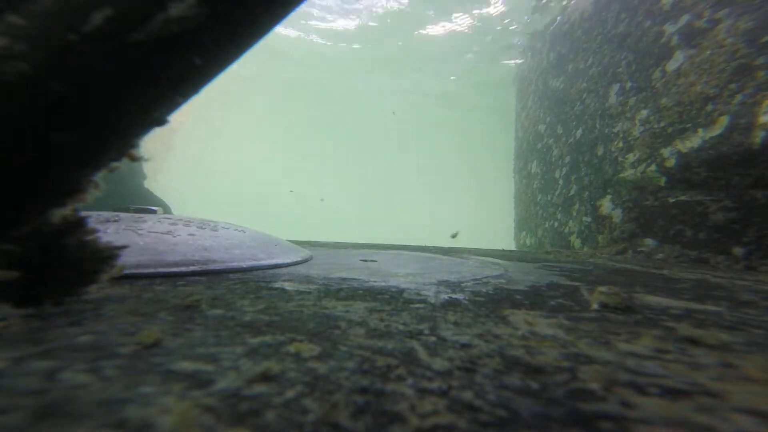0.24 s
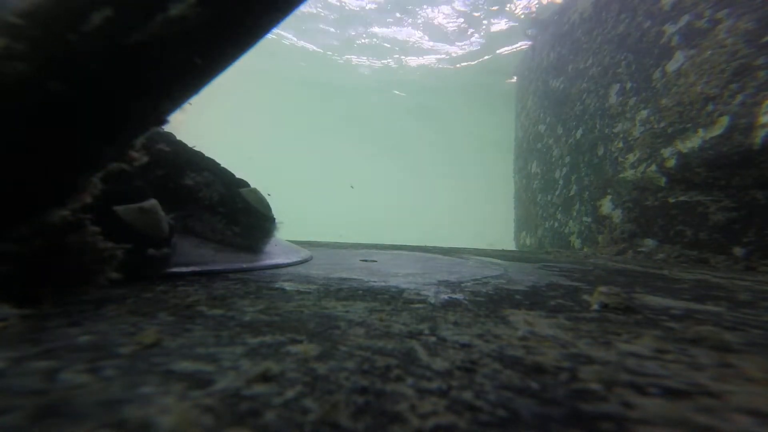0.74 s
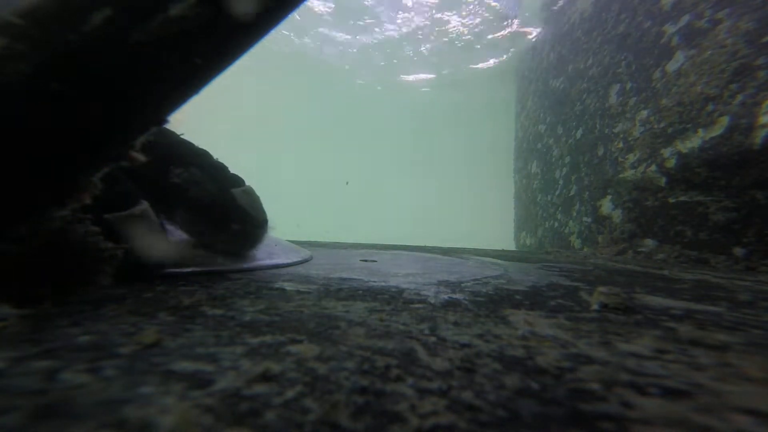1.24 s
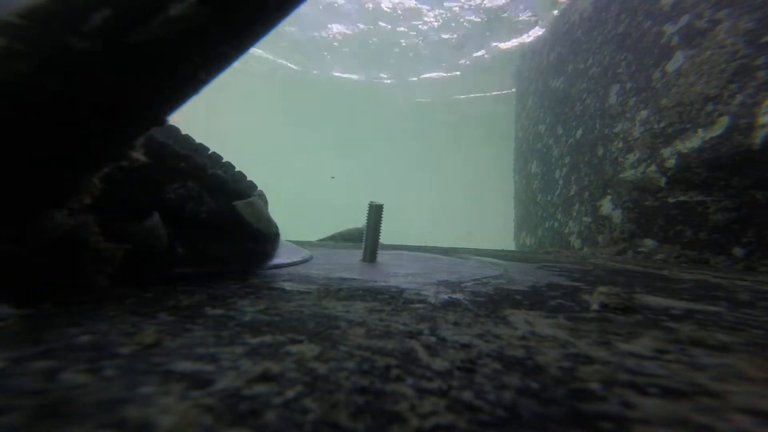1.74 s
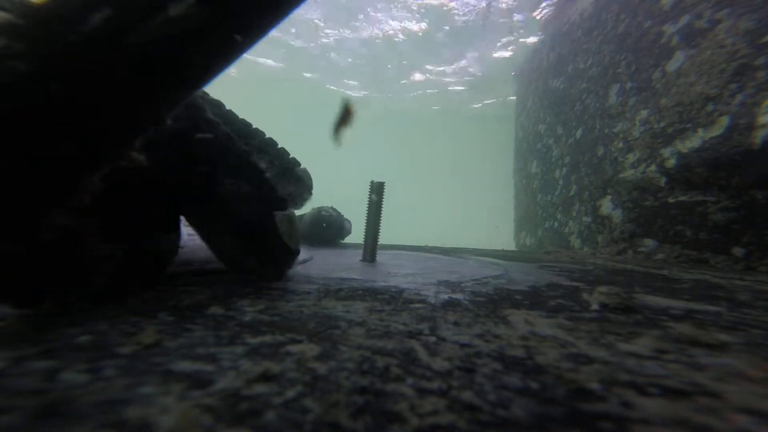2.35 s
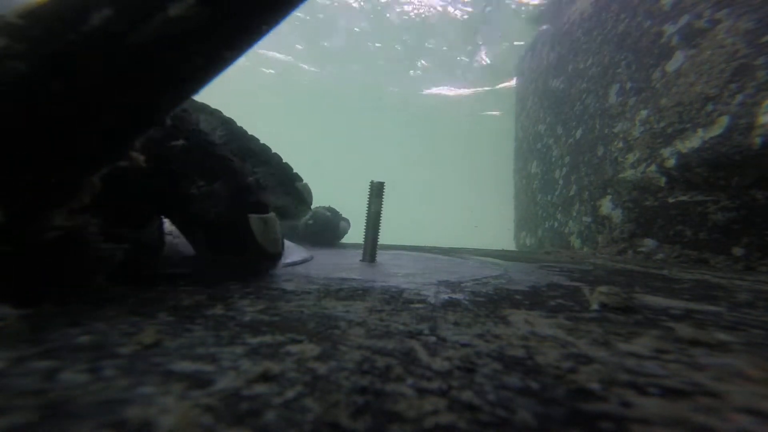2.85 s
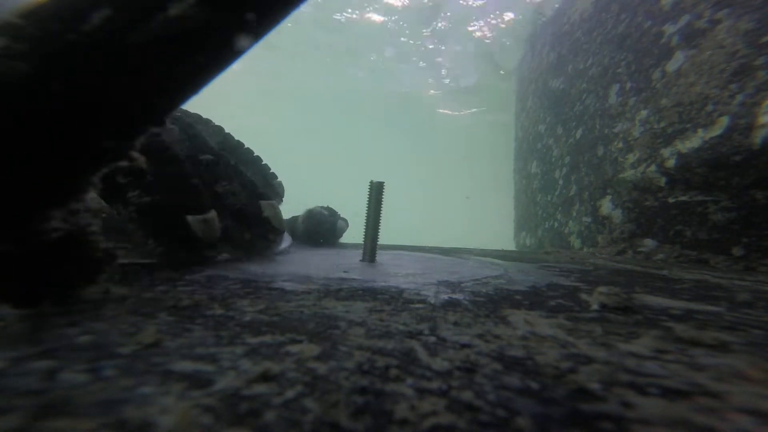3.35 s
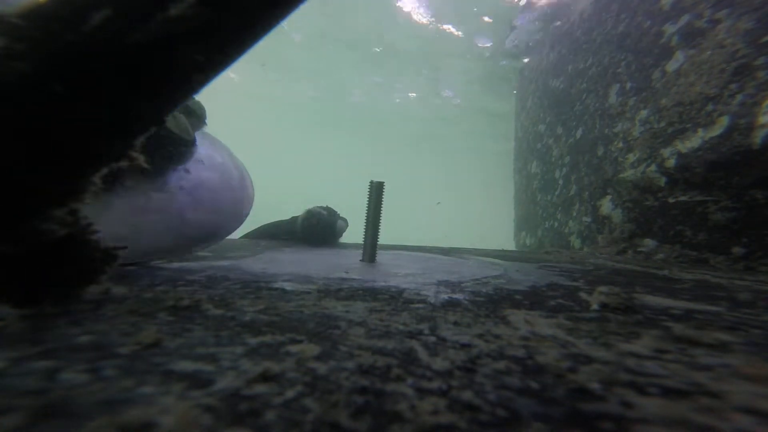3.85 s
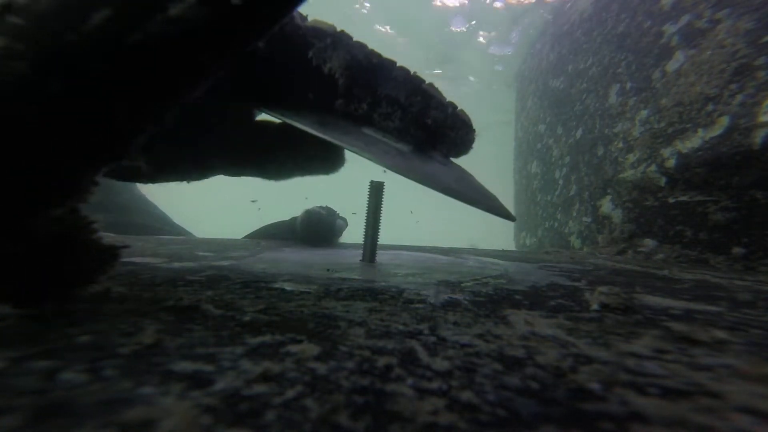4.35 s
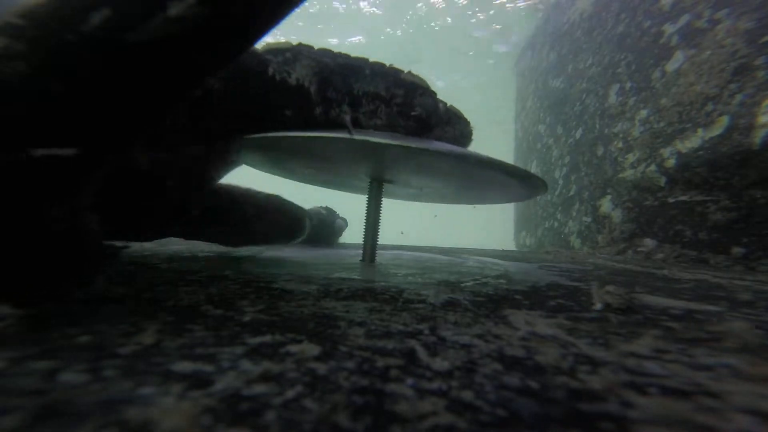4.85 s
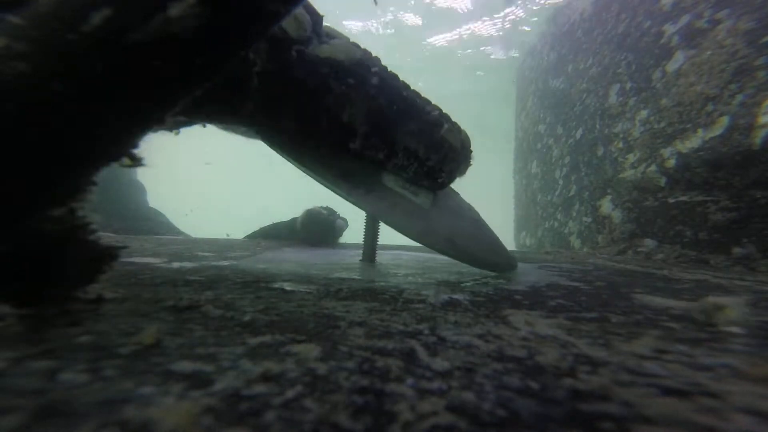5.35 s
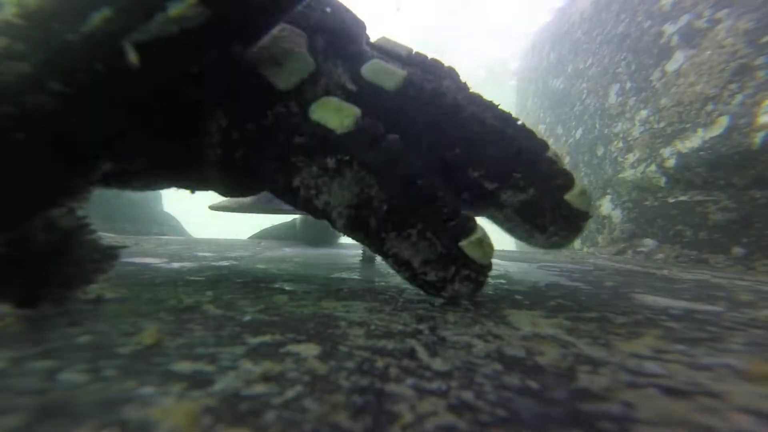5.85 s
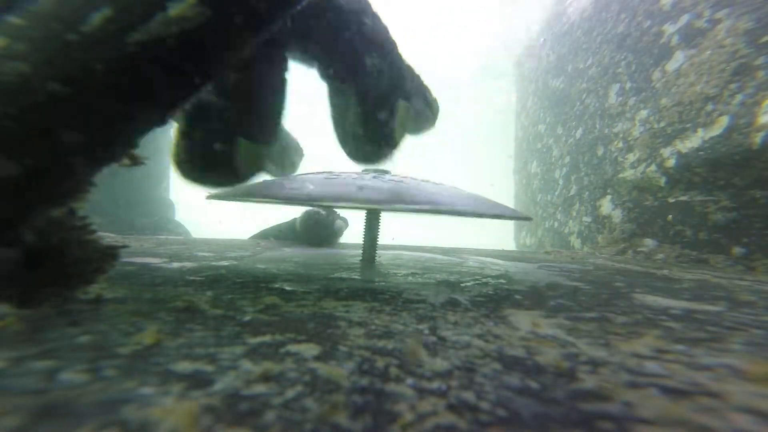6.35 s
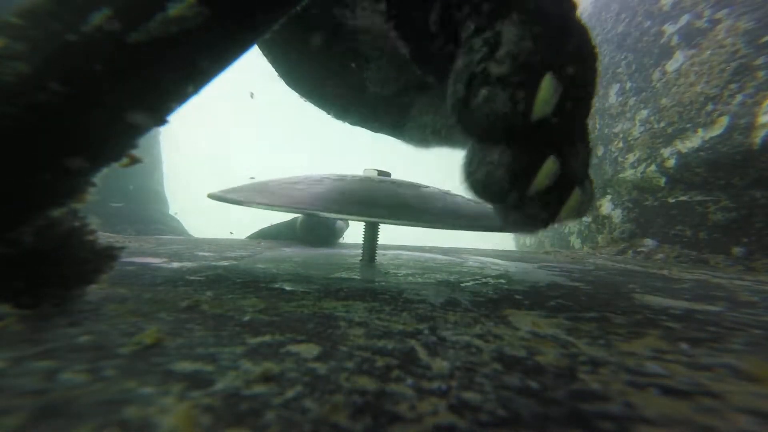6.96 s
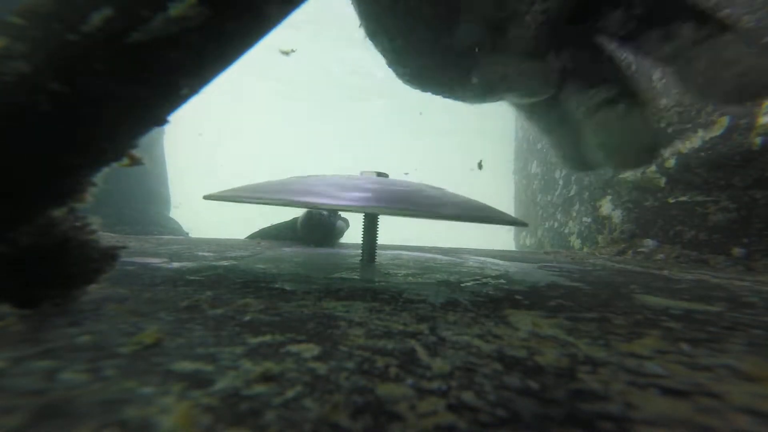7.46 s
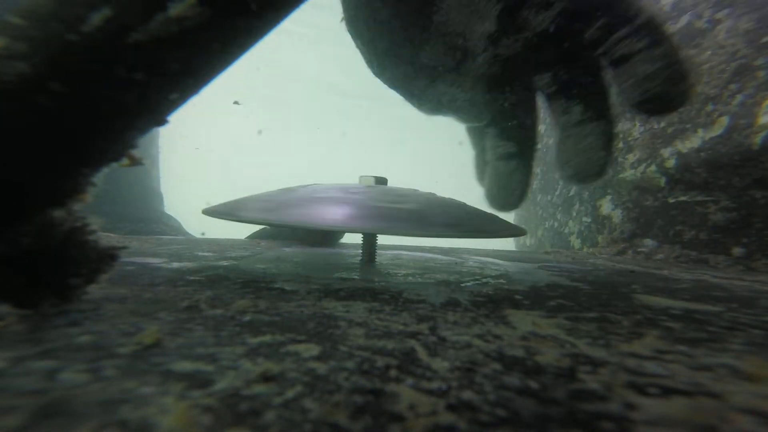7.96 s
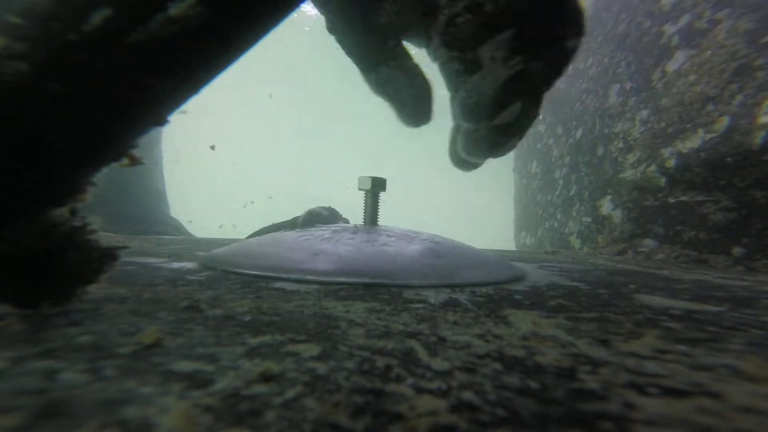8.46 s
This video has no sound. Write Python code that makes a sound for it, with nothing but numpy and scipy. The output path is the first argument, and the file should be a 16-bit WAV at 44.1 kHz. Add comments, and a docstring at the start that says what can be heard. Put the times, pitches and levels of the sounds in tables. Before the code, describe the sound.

Underwater, close muffled knocks and gritty metal scrapes ring a sealed housing over low surging rumble, bubbling rubs and a fast motor throb.

```python
"""Under water, knocks and scrapes ring a sealed camera's housing, some on one clear pitch, over a surging rumble.
A gloved diver slides a metal disc onto a bolt on a boat hull and spins it down: pushes and stick-slip clicks
excite damped modes of housing and disc. Bumps rock the camera, the hull booms and hums, bubbles gurgle as
gliding sines, and a motor on board repeats its knocks every turn. The level of these steady sounds twitches
in short steps and at times drops suddenly."""
import sys
import numpy as np
from scipy import signal
from scipy.io import wavfile
from scipy.ndimage import uniform_filter1d, minimum_filter1d

SR = 44100
rng = np.random.default_rng(int(sys.argv[2]) if len(sys.argv) > 2 else 0)


def master(y):
    """Save y as 16-bit WAV."""
    cut = np.clip(np.atleast_2d(y).T, -1, 1)
    pcm = np.round(cut * 32767)  # scale
    wavfile.write(sys.argv[1], SR, pcm.astype(np.int16))


N = 384111
T = np.arange(N) / SR  # time in s

# Modes of each family, roughly from low to high; level_db is relative within a family,
# t60_s holds where ring() adds no damping.
# hull plating: pitch_hz, t60_s, level_db
HULL = [(113.14, 0.69, -7), (150.3, 0.19, 4.5), (168.4, 0.37, -6), (197.9, 0.33, -3.5), (231.4, 0.11, 0.5),
        (276.6, 0.078, -2.5), (340.5, 0.079, -6), (397, 0.056, -16)]
# camera housing: pitch_hz, t60_s, level_db
HOUSING = [(553.5, 0.2, -8), (538, 0.03, 0), (607.5, 0.064, 7), (671.3, 0.04, 4.5), (720, 0.15, -9.5),
           (1036, 0.17, -18)]
# hard contact: pitch_hz, t60_s, level_db
CONTACT = [(840, 0.012, -5.5), (1047, 0.034, 1.5), (1148, 0.018, 3.5), (1248, 0.016, 2),
           (1440, 0.015, -5.5), (1632, 0.02, -8)]
# metal edge of the disc: pitch_hz, t60_s, level_db
EDGE = [(1870, 0.025, 7), (2025, 0.013, 8.5), (2420, 0.017, 0), (2670, 0.01, -1), (3060, 0.0055, -6.5),
        (3640, 0.007, -20), (4000, 0.006, -30)]
# highest ticks: pitch_hz, t60_s, level_db
TICK = [(4270, 0.0032, -1.5), (4900, 0.0035, -0.5), (5730, 0.0017, -3.5), (6750, 0.003, -4),
        (7800, 0.0022, -8), (9600, 0.0013, -14), (12500, .002, -9.5)]
# strokes of the disc over rough metal: start_s, end_s, contact_db, edge_db
SCRAPES = [(0.655, 0.702, -58, -71), (1.443, 1.545, -44.5, -67), (1.605, 1.613, -37.5, -48),
           (1.633, 1.67, -31.5, -55), (1.978, 2.02, -22, -39.5), (2.032, 2.094, -30.5, -53),
           (2.794, 2.84, -30, -57.5), (4.479, 4.512, -39, -56), (5.232, 5.255, -41, -53.5),
           (5.735, 5.766, -48, -71), (7.793, 7.833, -42.5, -67), (8.323, 8.347, -36, -53.5),
           (8.362, 8.395, -29.5, -51.5), (8.412, 8.446, -31.5, -55), (8.453, 8.459, -14, -38),
           (8.5, 8.523, -33.5, -49), (8.527, 8.537, -30, -47), (8.557, 8.576, -29, -47)]
# steady rubbing and gurgling of gloves on the housing: time_s, level_db
RUBBING = [(0.0, -26), (0.8, -27.5), (1.48, -26.5), (2.18, -48), (2.71, -39.5), (3.23, -39), (3.49, -46),
           (4.56, -26.5), (4.95, -33), (5.38, -26.5), (5.89, -33), (7.01, -25), (7.74, -29.5),
           (8.08, -29.5), (8.22, -29), (8.32, -18.5), (8.56, -27.5), (8.71, -44)]
# sound carried by the hull plating, motor and grinding grit alike: time_s, carried_db
CARRIED = [(0, -11), (1.1, -13.5), (1.5, -6.5), (2.1, -11.5), (2.4, -0.5), (2.7, 1), (3.1, 5), (3.43, -1.5),
           (3.8, 2), (4.15, 3), (4.45, 0), (4.8, -13), (5.4, -13), (5.8, -21), (6.5, -11), (7.1, -8),
           (7.85, -15.5), (8.2, -13.5), (8.4, -6.5), (8.71, 1)]
# water surge and hull boom: time_s, surge_db, boom_db
SURGE = [(0.0, -34, -27.5), (0.61, -25.5, -26), (1.62, -26, -32.5), (1.94, -30, -27), (2.28, -44, -36.5),
         (2.88, -29.5, -31), (3.2, -42.5, -28.5), (3.54, -41.5, -35.5), (3.95, -25.5, -33),
         (4.39, -35, -25), (4.66, -26.5, -21), (4.85, -16, -34), (5.19, -29.5, -27.5), (6.45, -33, -29.5),
         (7.16, -25.5, -23.5), (8.03, -35.5, -31.5), (8.3, -28.5, -31), (8.71, -39.5, -31)]
# sudden drops, each with a thin click (an end before the start leaves the click alone):
# start_s, end_s, change_db, click_peak_db
DIPS = [(.416, 0.37, -0.5, -36), (0.61, 0.69, -3.5, -40.5), (1.347, 1.08, -1, -70), (1.568, 1.26, -1, -45),
        (1.6, 2.04, -0.5, -36.5), (1.696, 1.9, -2, -45.5), (3.04, 3.185, -13, -45),
        (4.448, 4.55, -12, -33.5), (5.509, 5.546, -6, -38), (7.36, 6.3, 0.5, -30.5),
        (7.744, 6.8, 0.5, -40.5), (8.416, 9.2, -2, -41)]
STEP_S = .032  # grid of the level steps
SCRAPE_RISE_S, SCRAPE_FALL_S = 0.0034, 0.0062


def undb(db):
    """Amplitude ratio from the logarithmic level in dB."""
    return 10 ** (np.asarray(db) / 20)


def unit(x):
    """Normalization to an rms of 1."""
    return x / np.sqrt(np.mean(x ** 2))


def curves(table):
    """Linear interpolation in time of each column after the first."""
    s, *columns = np.transpose(table)
    return [np.interp(T, s, c) for c in columns]


def ring(x, modes, damp=1):
    """Modal resonance: x excites damped sines; seal and water take off what lies above them."""
    out = 0
    for hz, t60, db in modes:
        decay = damp * np.log(1000) / (t60 * SR)
        pole = np.exp(2j * np.pi * hz / SR - decay)
        out = out + undb(db) * signal.lfilter([1], [1, -pole], x).imag
    below = signal.butter(1, modes[0][0] / 1.6, "highpass", fs=SR, output="sos")
    above = signal.butter(9, modes[-1][0] * 0.93, fs=SR, output="sos")
    return signal.sosfilt(above, signal.sosfilt(below, out))


def grit(rate, spread_db):
    """Random impulse process: rate clicks a second, mostly small, now and then large."""
    chance = rng.random((N, 3)).T
    present = chance[0] < rate / SR
    sign = np.sign(chance[1] - .5)
    return present * sign * undb(-spread_db * np.log(1 - chance[2]))


def walk(rate):
    """Band-limited chance: smoothed random steps, rate a second, with an rms of 1."""
    k = int(SR / rate)
    steps = np.repeat(rng.standard_normal(N // k + 1), k)
    return unit(uniform_filter1d(steps, k)[:N])


def spells(rows, rise_s, fall_s):
    """Energy summation of gains that rise, hold until length_s after the start and decay exponentially."""
    power = np.zeros(N)
    for s, length_s, db in rows:
        rise = np.clip((T - s) / rise_s, 0, 1)
        fall = np.exp(-np.clip(T - s - length_s, 0, None) / fall_s)
        power += (undb(db) * rise * fall) ** 2
    return np.sqrt(power)


def blows(times, db, modes, rattle_s):
    """Impact excitation: a sharp push, then a dying rattle, rings the modes up to a peak of db."""
    t = np.arange(int(6 * rattle_s * SR) + 1) / SR
    rattle = rng.standard_normal((len(times), len(t))) * np.exp(-t / rattle_s)
    rattle[:, 0] += 0.75 * np.sqrt(rattle_s * SR)  # the push
    x = np.zeros(N + len(t))
    for s, d, r in zip(times, db, rattle):
        one_period = np.zeros(int(SR / modes[0][0]))
        peak = np.abs(ring(np.r_[r, one_period], modes)).max()
        at = int(s * SR)
        x[at:at + len(t)] += r * undb(d) / peak
    return ring(x[:N], modes)


def knocks():
    """Impact of disc on bolt and hull: each knock shares its force among the families of modes."""
    # peak_db is that of the housing, the levels after it are relative to it:
    # time_s, peak_db, hull_db, contact_db, edge_db, tick_db
    knock_rows = [(0.077, -14.5, -15.5, -44.5, -42, -73.5), (0.21, -19, -13, -31, -49.5, -68),
                  (0.384, -22, -12.5, -37, -48, -60), (0.655, -0.5, -16, -12, -21.5, -46),
                  (0.69, -25, 2, -7.5, -21, -35), (0.745, -14.5, -20, -9, -36, -68),
                  (0.856, -13.5, -11, -43, -52, -61), (0.968, -19.5, -5, -21.5, -49, -61),
                  (1.003, -11.5, -15.5, -16, -48, -78), (1.297, -17, 7.5, -17, -38, -69),
                  (1.334, -13, -13, -8, -23, -28), (1.340, -7, -17, -12.5, -23, -27.5),
                  (1.395, -10, -12.5, -25, -32, -44), (1.419, -15.5, -13.5, -28, -46, -42),
                  (1.469, -38, -6, -24, -39, -39), (1.498, -22, -8.5, -13, -36, -34),
                  (1.52, -16, 8.5, -0.5, -11, -24), (1.54, -14, 5.5, -8, -33, -52),
                  (1.612, -19.5, -16, -16, -27, -48), (1.637, -16, -19, -22, -33, -65),
                  (1.65, -3.5, -4.5, -19, -26, -45), (1.703, -16, -19.5, 2, -11, -51),
                  (1.819, -27.5, -6.5, -20, -43, -62), (1.848, -21.5, 2, -7, -32.5, -59),
                  (1.875, -32.5, 13.5, -2, -16, -54), (1.903, -16.5, 2, 1.5, -20, -63),
                  (1.928, -25, -7, 2, -9, -67), (1.9709, -14.5, -4, 6, -8, -33),
                  (1.975, -22, -8, 15, -14.5, -57), (1.982, -20.5, -13, 9, 0.5, -20),
                  (1.999, -22, -4, -2, -25, -43), (2.017, -10, -5, 0, -15, -43),
                  (2.02, -13, 0.5, 4, -6, -29), (2.031, -25, -6, 6, -28, -56), (2.045, -19, -3, 8, -8, -55),
                  (2.072, -18, -3.5, -16, -25, -31), (2.081, -15, -11, 0, -12, -36),
                  (2.546, -28.5, -5.5, 7, -21, -62), (2.58, -28, -9.5, 3, -25, -60),
                  (2.803, -21.5, 1, 7.5, -14, -57), (3.019, -29, -17, 8, -14, -39),
                  (3.097, -6, -9, -10, -44, -39.5), (3.116, -15.5, 9.5, 3.5, -21, -60),
                  (3.227, -21.5, -4.5, 9.5, -24, -56), (3.276, -13, -8, 1, -32, -41),
                  (3.291, -13.5, -0.5, 3, -33, -36), (3.722, -28.5, 13, 4.5, -15.5, -65),
                  (3.774, -27, -4, 2, -20, -24), (3.902, -36, -11.5, 16, -14, -54),
                  (4.056, -18.5, -20, -9, -35, -54), (4.495, -8, -2, -16, -31, -38),
                  (4.539, -19, 3, -12, -53.5, -65), (4.614, -16, -4, -27, -47, -75),
                  (4.652, -20, -2, -6, -27, -78), (4.687, -14.5, -2.5, -13, -31, -83),
                  (4.725, -22.5, -3.5, -6.5, -32, -65), (5.153, -15, -11, -36.5, -55.5, -69.5),
                  (5.236, -9.5, -1, -15, -45, -42), (5.249, -5, -12, -40.5, -29, -76.5),
                  (5.343, -22.5, -1, -30, -58, -78), (5.493, -16, -2.5, -19, -39, -71),
                  (5.548, -5.5, -12, -13, -37, -48), (5.562, -5, -17, -46.5, -65, -83),
                  (5.715, -17, -22, -20.5, -32, -62.5), (5.742, -12, -7, -29, -50, -67),
                  (5.763, -18, 2.5, -21.5, -34.5, -64), (6.307, -15, -23.5, -38, -56, -71),
                  (6.436, -23.5, -9, -12.5, -41, -69), (6.837, -10.5, 2, -31.5, -56.5, -73),
                  (6.893, -8, -14.5, -37, -46.5, -74), (7.064, -12, -19, -37, -49, -71),
                  (7.092, -13, -9.5, -40, -42, -66), (7.3, -7, -5, -30, -55.5, -63.5),
                  (7.316, -16.5, 3, -29, -48, -70), (7.329, -10, -13.5, -30, -53.5, -55),
                  (7.343, -22.5, -2, -27, -43.5, -67), (7.404, -12, 0, -27, -48, -71),
                  (7.751, -9.5, -19, -39.5, -47, -69), (7.765, -12.5, -9.5, -32, -40, -63),
                  (7.801, 1, -15.5, -39.5, -46, -53), (7.821, -5.5, 2, -16, -36.5, -43),
                  (7.835, -10.5, -3.5, -23, -37, -53.5), (8.052, -17, -27.5, -34, -56, -70),
                  (8.078, -19, -18, -26, -50.5, -79), (8.088, -12, -16.5, -26, -48, -61),
                  (8.117, -9.5, -12.5, -29, -49, -78), (8.145, -9, -15.5, -22, -48, -83.5),
                  (8.162, -13, -21.5, -19, -43, -64.5), (8.193, -18.5, -15.5, -33, -41, -63),
                  (8.208, -8.5, -29, -24, -48, -68), (8.217, -10.5, -22.5, -20, -45, -67),
                  (8.233, -13, -9.5, -31, -53, -70), (8.274, -13, -17, -20, -44, -61),
                  (8.339, -17, -17, -26, -36, -63.5), (8.375, -16, -13, -17.5, -27, -43.5),
                  (8.42, -26, -7, -19, -21, -46), (8.44, -13, -4, -19, -25, -52),
                  (8.458, -7, -0.5, 2, -33, -41), (8.508, -22, 6, -5, -23, -53),
                  (8.532, -24, -5, -11, -21, -57), (8.557, -21, 0.5, -3, -19.5, -55.5)]
    s, db, boom_db, hard_db, edge_db, tick_db = np.transpose(knock_rows)
    # modes, level in dB, rattle in s
    parts = [(HULL[3:], boom_db, .002), (HOUSING, 0, .0015), (CONTACT, hard_db, .002),
             (EDGE, edge_db, .0015), (TICK, tick_db, .001)]
    return sum(blows(s, db + d, modes, rattle_s) for modes, d, rattle_s in parts)


def rings():
    """Damped free vibration: single tones swell quickly and die away, each on its own pitch."""
    # clear rings, level before the swell: start_s, level_db, pitch_hz, rise_s, t60_s
    ring_rows = [(.038, -10.5, 590, 0.0049, .06), (.075, -7, 580, 0.0015, .03),
                 (.212, -12.5, 520, 0.0047, .07), (.38, -13, 640, 0.0032, .07),
                 (.463, -10, 47, 0.009, 0.65), (.654, -9.5, 640, 0.00086, 0.036),
                 (.743, -14, 620, .001, .03), (1.001, -10.5, 640, 0.0012, 0.025),
                 (1.366, -16, 500, 0.00071, .03), (1.396, -14, 240, 0.0012, .05),
                 (1.559, -9.5, 330, .002, .05), (1.702, -20.5, 1120, 0.0011, .015),
                 (1.971, -22, 2900, .0005, 0.019), (1.982, -35, 2710, .002, .03),
                 (1.995, -40, 2950, .002, 0.027), (1.997, -13, 1350, .003, .04),
                 (2.014, -10, 845, 0.0011, 0.022), (2.037, -8, 900, 0.00092, 0.017),
                 (2.057, -22, 1100, .001, 0.024), (2.047, -36, 2800, .001, 0.024),
                 (2.072, -37, 2110, 0.00091, .015), (2.079, -6, 1240, .001, .018),
                 (3.119, -10, 150, 0.0015, .1), (3.155, -14, 125, 0.0026, .1), (3.27, -13, 950, .002, .04),
                 (3.772, -20.5, 854, .002, 0.057), (3.914, -20, 923, 0.0018, 0.052),
                 (4.054, -30, 620, 0.0023, .05), (4.183, -25, 880, .002, .05),
                 (4.312, -17.5, 600, 0.0027, .06), (4.495, -37, 2250, 0.00093, .015),
                 (4.496, -13, 810, 0.0012, 0.017), (4.498, -10.5, 135, 0.0033, .15),
                 (4.514, -44, 2200, .001, .015), (4.612, -11.5, 600, 0.0027, .05),
                 (4.652, -34.5, 2250, 0.00093, .015), (4.685, -48, 2150, .001, .015),
                 (4.724, -44, 2200, 0.00087, .015), (4.733, -42, 2250, .001, .015),
                 (4.748, -48.5, 2150, .001, .015), (5.547, -20.5, 1510, 0.00057, .016),
                 (5.548, -9, 763, 0.0008, 0.079), (5.563, -9, 671, 0.0022, 0.065),
                 (6.835, -12.5, 616, 0.0011, .04), (6.893, -12, 615, 0.0014, 0.038),
                 (7.405, -7, 380, .002, 0.077), (7.785, -17, 605, 0.0024, 0.019),
                 (7.832, -16, 590, 0.0015, .04), (8.049, -4.5, 680, .003, .03),
                 (8.075, -14, 640, 0.0035, .04), (8.139, -2.5, 660, 0.0063, .07),
                 (8.159, -14, 680, .004, .09), (8.207, -10, 680, 0.0012, .05), (8.231, -9, 660, .003, .04),
                 (8.272, -7.5, 620, 0.0053, .07), (8.333, -13, 600, 0.0065, .09),
                 (8.374, -16, 643, 0.0053, .08), (8.456, -8, 1085, 0.0012, .02)]
    out = np.zeros(N)
    t = np.arange(SR // 4) / SR  # each tone stops after a quarter second
    for s, db, hz, rise_s, t60 in ring_rows:
        envelope = undb(db - 60 * t / t60) * np.tanh((t / rise_s) ** 2)
        at = int(s * SR)
        out[at:at + len(t)] += envelope * np.sin(2 * np.pi * hz * t)
    return out


def scraping():
    """Stick-slip: patchy chatter of the disc during each stroke; the modes ring out after it."""
    chatter = unit(grit(800, 1.5) * undb(1.5 * walk(71)))
    hard = spells([(a, b - a, db) for a, b, db, _ in SCRAPES], SCRAPE_RISE_S, SCRAPE_FALL_S)
    edge = spells([(a, b - a, db) for a, b, _, db in SCRAPES], SCRAPE_RISE_S, SCRAPE_FALL_S)
    parts = [(hard, CONTACT), (edge, EDGE)]
    return sum(ring(press * chatter, modes) / ring(chatter, modes).std() for press, modes in parts)


def drag():
    """Continuous stick-slip: one long drag over the hull rings the disc body, its edge and the ticks."""
    # course of the drag: time_s, body_db, edge_db
    course = [(3.07, -60, -73), (3.102, -16.5, -47), (3.112, -18.5, -41), (3.138, -27.5, -55),
              (3.216, -22.5, -48.5), (3.22, -22, -42), (3.296, -14, -42.5), (3.334, -23, -52.5),
              (3.344, -19, -39.5), (3.378, -37, -87), (3.41, -58, -67)]
    # modes of the dragged disc body: pitch_hz, t60_s, level_db
    body_modes = [(290, 0.028, -1), (374, 0.051, 1.5), (518, 0.056, 0.5), (668, 0.043, 0.5), (775, .04, -3),
                  (903, 0.031, 3.5), (1070, 0.021, -4), (1263, 0.028, 0), (1505, 0.021, -10.5)]
    # modes of the dragged disc edge: pitch_hz, t60_s, level_db
    edge_modes = [(1940, .02, 7.5), (2050, 0.024, 17), (2230, 0.017, 21), (2370, .02, 12), (2650, 0.032, 6),
                  (2880, 0.015, -18), (3520, .012, -28), (3750, .01, -38)]
    chatter = grit(2000, 1.26) * undb(0.54 * walk(60))
    body_db, edge_db = curves(course)
    fade_in = np.clip((T - course[0][0]) / 0.024, 0, 1)
    fade_out = np.clip((course[-1][0] - T) / 0.026, 0, 1)
    parts = [(body_modes, body_db), (edge_modes, edge_db), (TICK, edge_db - 32.5)]
    return fade_in * fade_out * sum(undb(db) * unit(ring(chatter, modes)) for modes, db in parts)


def grains():
    """Micro-impacts: short gritty contacts ring the edge of the disc and the lowest ticks."""
    # gritty contacts of the disc edge: time_s, edge_peak_db, tick_peak_db
    grain_rows = [(1.435, -48, -67), (1.444, -45, -61), (1.4554, -49, -66), (1.463, -55, -69),
                  (1.472, -45, -56), (1.483, -54, -76), (1.5015, -43, -57), (1.506, -48.5, -63),
                  (1.514, -37, -52), (1.6675, -45, -63.5), (1.6864, -48.5, -65.5), (7.295, -59, -71.5),
                  (7.417, -50, -68), (8.165, -60, -62), (8.1724, -64, -59.5), (8.1804, -65.5, -64),
                  (8.1954, -55.5, -62), (8.207, -61, -62), (8.218, -60, -67), (8.2224, -62, -67),
                  (8.2556, -62, -68), (8.278, -59, -66.5), (8.2884, -52, -66)]
    s, edge_db, tick_db = np.transpose(grain_rows)
    return blows(s, edge_db, EDGE, 0.0013) + blows(s, tick_db, TICK[:2], 0.0018)


def disc_face():
    """Plate resonance: dense scuffs ring the face of the disc, clanks ring its low modes."""
    # dense scuffs: start_s, length_s, level_db
    scuff_rows = [(.05, 0.39, -71), (.74, 0.065, -62), (1.43, 0.044, -53), (1.495, 0.018, -42.5),
                  (2.51, 0.0065, -46), (4.33, .02, -49), (4.5, 0.065, -68), (4.61, .15, -62),
                  (5.74, 0.026, -57), (7.31, 0.022, -63), (7.4, 0.016, -56), (8.05, 0.0099, -60),
                  (8.085, 0.0058, -53), (8.115, 0.0055, -47), (8.142, 0.069, -56), (8.232, 0.0075, -61),
                  (8.27, 0.059, -58)]
    # modes of the disc face: pitch_hz, t60_s, level_db
    face_modes = [(1430, 0.014, 0), (1620, 0.022, 7.5), (1720, 0.017, 0.5), (2050, 0.017, -7),
                  (2300, .015, -11), (2620, .01, -12)]
    # clanks: time_s, peak_db
    clank_rows = [(.656, -22.5), (1.396, -40), (1.702, -27), (2.080, -40), (5.249, -29), (5.548, -20),
                  (5.594, -46.5), (5.743, -48), (8.458, -26)]
    scuff = grit(1500, 1.5)
    press = spells(scuff_rows, SCRAPE_RISE_S, SCRAPE_FALL_S)
    scuffs = ring(press * scuff, face_modes) / ring(scuff, face_modes).std()
    return scuffs + blows(*np.transpose(clank_rows), face_modes[:3], .001)


def rubbing():
    """Stick-slip: clicks ring the housing; clicks and fine grit, partly alike each motor turn, ring the disc."""
    # harder strokes of the rubbing: start_s, length_s, level_db
    stroke_rows = [(.042, 0.037, -37), (.15, 0.15, -27), (.38, 0.11, -32.5), (.995, 0.067, -29.5),
                   (1.34, 0.075, -29), (1.51, 0.046, -24.5), (1.635, 0.079, -25.5), (2.8, 0.018, -31),
                   (3.097, 0.026, -32.5), (4.496, 0.28, -30.5), (5.236, 0.025, -21.5), (5.475, 0.03, -26),
                   (5.563, 0.018, -14), (6.836, 0.1, -23), (7.06, 0.04, -27.5), (7.3, 0.037, -30),
                   (7.406, 0.019, -25), (7.751, 0.092, -24.5), (8.05, 0.11, -24.5), (8.14, 0.073, -20),
                   (8.27, 0.14, -26)]
    repeating = 1.3  # amplitude of the grit that comes round each turn, re the grit that does not
    (db,), (carried_db,) = curves(RUBBING), curves(CARRIED)
    clicks = unit(grit(520, 2.0) * undb(1.7 * walk(14)))
    fine = unit(grit(3000, 0.52))
    turn = (T * MOTOR_HZ % 1 * SR / MOTOR_HZ).astype(int)  # samples into a motor turn
    grind = 0.53 * clicks + fine + repeating * fine[::-1][turn]
    rub = np.hypot(undb(db - 6), spells(stroke_rows, 0.0025, 0.014))
    # grinding follows the carried sound, by a slope in dB per dB
    parts = [(clicks, HOUSING, rub),
             (grind, CONTACT, undb(-45 + 1.8 * carried_db)),
             (grind, EDGE, undb(-66.5 + 1.05 * carried_db))]
    return sum(gain * unit(ring(x, modes)) for x, modes, gain in parts)


def bubbles():
    """Bubble oscillation: air squeezed from under the gloves gives gliding blips of scattered pitch."""
    per_s, median_hz, pitch_spread = 90, 582.7, .22
    decay_cycles, glide_spread = 4.5, .04
    count = int(per_s * N / SR)
    at, size = rng.random((count, 2)).T[:, :, None]
    pitch, glide = rng.standard_normal((count, 2)).T[:, :, None]
    t = np.arange(2600)  # samples
    cycles = median_hz * np.exp(pitch_spread * pitch) * t / SR
    age = cycles / decay_cycles
    envelope = (1 - np.exp(-cycles ** 2)) * np.exp(-age) * (1 - t / len(t))
    tone = np.sin(2 * np.pi * cycles * (1 + glide_spread * glide * age / 2))
    blips = undb(-1.5 * np.log(1 - size)) * envelope * tone
    places = (at * N).astype(int) + t
    stream = unit(np.bincount(places.ravel(), blips.ravel(), N)[:N])
    return undb(curves(RUBBING)[0] - 6.5) * stream


MOTOR_HZ = 29.46  # turns per second


def motor():
    """Periodic impacts: the same knocks and clatter every turn, each a little uneven, carried by the hull."""
    # knocks within a turn, brightness relative to the level: turn_share, level_db, brightness_db
    strokes = [(-.012, 7.5, -7), (0.07, -4, 0.5), (0.378, -13.5, 12.5), (0.619, -22, -5.5)]
    # modes of the motor casing: pitch_hz, t60_s, level_db
    casing = [(1420, 0.03, -5.5), (1535, 0.025, -5), (1790, 0.018, -8), (1886, .015, -15),
              (2074, 0.021, -10.5), (2300, 0.03, -6.5)]
    turn_at_s = 3.460  # a moment at which a turn begins
    carried_db, = curves(CARRIED)
    db = -35.5 + carried_db + 2.5 * walk(23)  # the level flutters
    turns = np.arange(np.ceil(-turn_at_s * MOTOR_HZ), (N / SR - turn_at_s) * MOTOR_HZ - 1)
    clatter = [(share, -21, 0) for share in rng.random(size=14)]
    dull, bright = np.zeros(N), np.zeros(N)
    for share, stroke_db, edge_db in strokes + clatter:
        jitter, uneven = rng.standard_normal((len(turns), 2)).T
        at_s = turn_at_s + (turns + share) / MOTOR_HZ + .00005 * jitter
        at = (at_s * SR).astype(int).clip(0)
        dull[at] -= undb(stroke_db + 1.5 * uneven)
        bright[at] -= undb(stroke_db + edge_db + 1.5 * uneven)
    # knocks, modes, level in dB; the casing's levels follow the carried sound by a slope in dB per dB
    parts = [(dull, HULL, 3.5), (dull, HOUSING, 8.5), (dull, CONTACT, 1.5),
             (dull, casing[:4], -4.5 - 0.22 * carried_db),
             (bright, casing[4:], -13.5 + 0.24 * carried_db)]
    out = 0
    for x, modes, d in parts:
        r = ring(x, modes, damp=2.5)
        out = out + undb(d) * r / np.percentile(np.abs(r), 99)
    return undb(db) * out


def water_swell():
    """Low-frequency forcing: surging water shoves the camera, bumps rock it, and water sloshes after each."""
    # rocking modes of the camera on its seat: pitch_hz, t60_s, level_db
    swell_modes = [(26.9, 0.75, -18.5), (44.5, 0.4, -5.5), (61.6, 0.27, 2.5), (81, 0.71, -1.5)]
    # bumps that rock the camera: time_s, peak_db
    bump_rows = [(0.458, -16), (2.63, -24.5), (2.778, -25), (3.728, -21.5), (4.483, -13.5), (4.721, -22.5),
                 (5.225, -10.5), (5.759, -22), (7.391, -20), (8.167, -20.5)]
    surge_db, _ = curves(SURGE)
    surge = unit(ring(rng.standard_normal(N), swell_modes, damp=1.5))
    slosh = spells([(s, 0.017, db - 3) for s, db in bump_rows], 0.025, 0.12)
    bumps = blows(*np.transpose(bump_rows), swell_modes, 0.00043)
    return np.hypot(undb(surge_db), slosh) * surge + bumps


def hull_boom():
    """Plate resonance: random slaps make the hull plating boom, more so as hands press it."""
    # spells of booming as hands press the hull: start_s, length_s, level_db
    boom_rows = [(0.245, 0.054, -21.5), (0.343, 0.037, -25), (0.493, 0.015, -28), (1.076, 0.027, -25),
                 (1.291, 0.083, -23), (1.351, 0.098, -16.5), (1.513, 0.064, -15.5), (1.646, 0.086, -17.5),
                 (2.009, 0.13, -23.5), (2.798, 0.054, -19), (3.095, 0.099, -25), (3.269, 0.054, -41),
                 (3.324, 0.041, -34), (3.722, 0.029, -14.5), (4.372, 0.094, -22.5), (4.492, 0.34, -24.5),
                 (4.723, 0.068, -18.5), (5.15, 0.03, -21.5), (5.234, 0.064, -14), (5.336, 0.04, -19.5),
                 (5.398, 0.029, -28), (5.765, 0.077, -23.5), (6.16, 0.032, -21.5), (6.83, 0.22, -23.5),
                 (7.102, 0.063, -24), (7.269, 0.17, -26), (7.401, 0.043, -13.5), (7.814, 0.056, -22),
                 (8.453, 0.16, -27)]
    _, boom_db = curves(SURGE)
    boom = unit(ring(grit(120, 2.06), HULL))
    return np.hypot(undb(boom_db), spells(boom_rows, 0.041, 0.012)) * boom


def notes():
    """Frequency modulation: low tones in the hull waver slightly as they swell and die."""
    # short low notes: start_s, length_s, level_db, pitch_hz
    note_rows = [(0.252, 0.18, -27.5, 145), (1.066, 0.032, -22, 202.4), (1.375, 0.068, -21.5, 190.4),
                 (1.534, 0.027, -17.5, 173.5), (2.794, 0.029, -18, 138.6), (2.958, 0.066, -24, 118.4),
                 (3.092, 0.048, -11, 135), (3.261, 0.16, -27, 112.5), (6.88, 0.093, -23, 199.5),
                 (7.29, 0.047, -23.5, 147.6), (7.46, 0.24, -33.5, 350.4), (7.817, 0.055, -31, 196),
                 (8.12, 0.11, -43.5, 329.6), (8.46, 0.039, -24, 159.5)]
    warped_s = np.cumsum(1 + .03 * walk(25)) / SR  # pitch wavers by 3 % rms
    out = 0
    for s, length_s, db, hz in note_rows:
        gain = spells([(s, length_s, db)], 0.02, 0.047)
        out = out + gain * np.sqrt(2) * np.sin(2 * np.pi * hz * warped_s)
    return out


def treble_hiss():
    """Filtered noise: a faint treble hiss follows what the hull carries, and grit sprays during scrapes."""
    spray = spells([(a, b - a, db - 30.5) for a, b, _, db in SCRAPES], SCRAPE_RISE_S, SCRAPE_FALL_S)
    bed = undb(-88 + 0.43 * curves(CARRIED)[0] + 4.1 * walk(9))
    hiss = unit(ring(rng.standard_normal(N), TICK[3:6], damp=0.85))
    return bed * hiss + spray * unit(ring(grit(500, 3.0), TICK))


def level_steps():
    """Stepwise gain in dB: a small random twitch each step, and dips that start on a step and let go softly."""
    step = (T / STEP_S).astype(int)
    twitch = rng.standard_normal(step[-1] + 1)[step]
    db = .1 * uniform_filter1d(twitch, size=5)
    for start, end, dip_db, _ in DIPS:
        begun = uniform_filter1d(1. * (step >= round(start / STEP_S)), size=45)
        db = db + dip_db * begun * np.clip((end - T) / 0.0043, 0, 1)
    return db


def dip_clicks():
    """Short impulse: a thin triangular click on the step at the start of each row of DIPS."""
    x = np.zeros(N)
    for start, _, _, db in DIPS:
        x[int(round(start / STEP_S) * STEP_S * SR)] = undb(db)
    return uniform_filter1d(uniform_filter1d(x, size=5), size=5) * 5  # keeps the peak


def scene():
    """Superposition: steady layers follow the level steps; knocks, scrapes and hiss come on top."""
    steady = rubbing() + bubbles() + motor() + water_swell() + hull_boom() + notes()
    metal = knocks() + rings() + scraping() + drag() + grains() + disc_face()
    return (metal + steady * undb(level_steps()) + dip_clicks() + treble_hiss())[None]


def record(dry):
    """Gain reduction: a look-ahead limiter holds the peaks; faint circuit hiss; a steep low-pass."""
    room = np.minimum(1, .61 / (np.abs(dry) + 1e-9))
    gain = uniform_filter1d(minimum_filter1d(room, size=441), size=441)  # 10 ms windows
    wet = gain * dry + undb(-101) * rng.standard_normal(dry.shape)
    return signal.sosfilt(signal.ellip(8, .2, 30, 15500, fs=SR, output="sos"), wet)


dry = scene()
out = record(dry)
master(out)
```